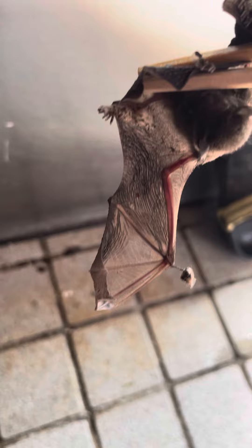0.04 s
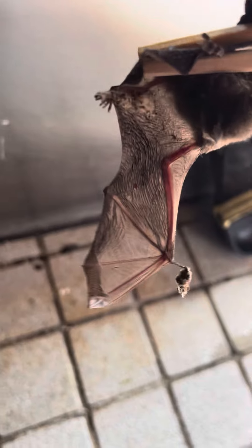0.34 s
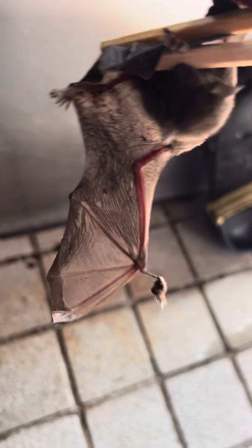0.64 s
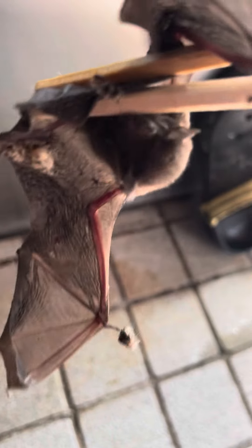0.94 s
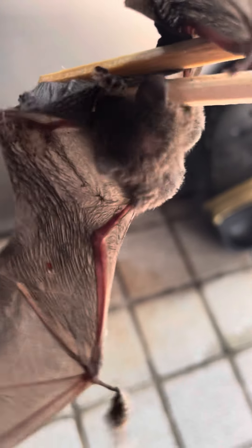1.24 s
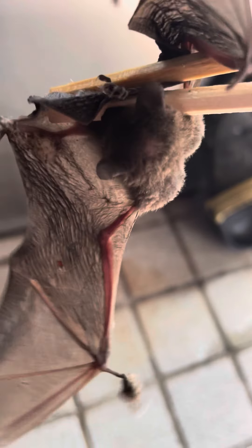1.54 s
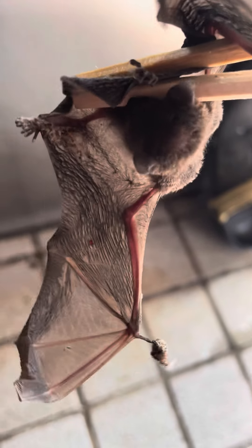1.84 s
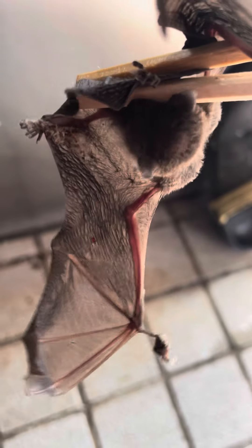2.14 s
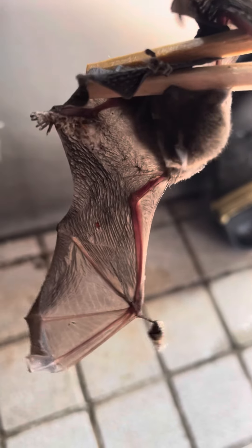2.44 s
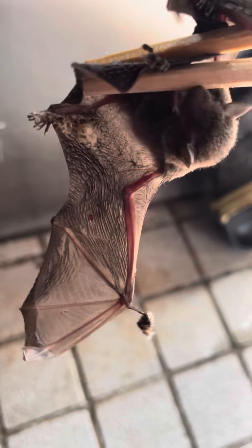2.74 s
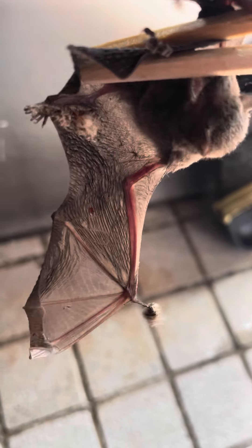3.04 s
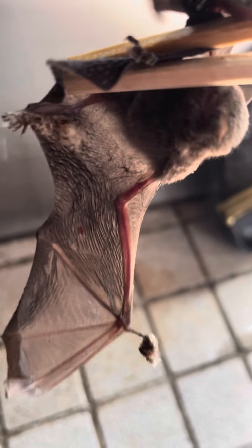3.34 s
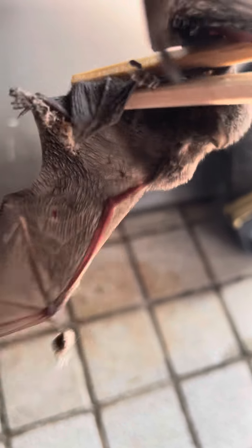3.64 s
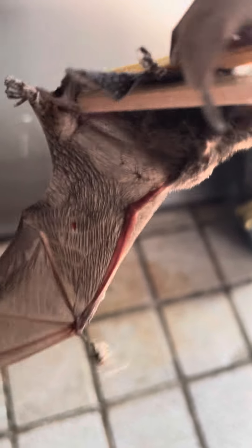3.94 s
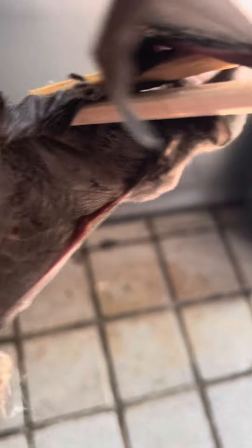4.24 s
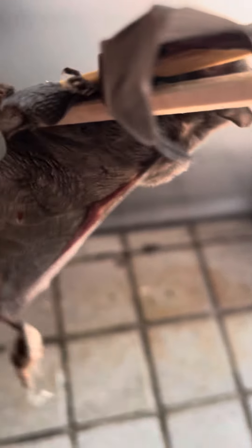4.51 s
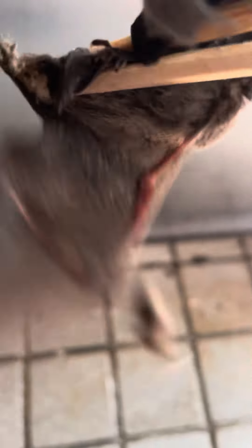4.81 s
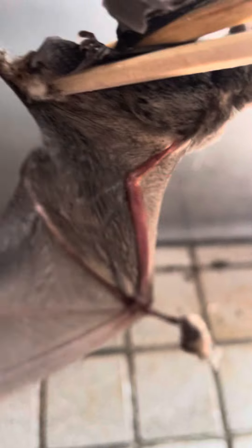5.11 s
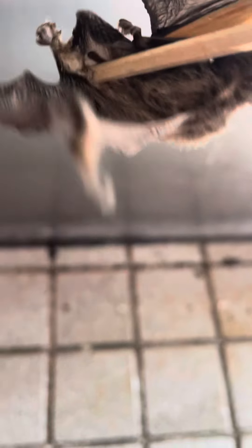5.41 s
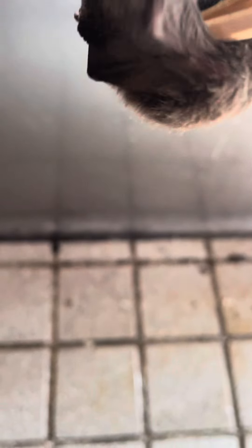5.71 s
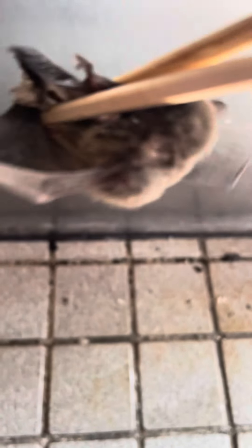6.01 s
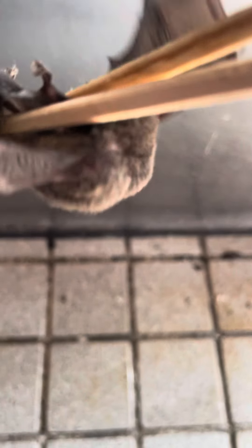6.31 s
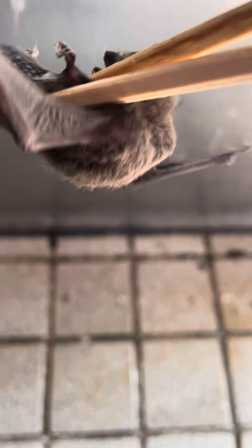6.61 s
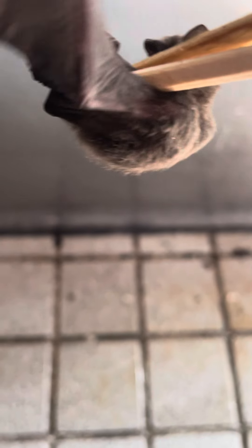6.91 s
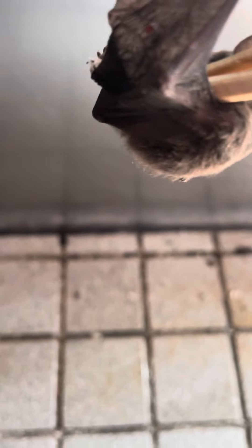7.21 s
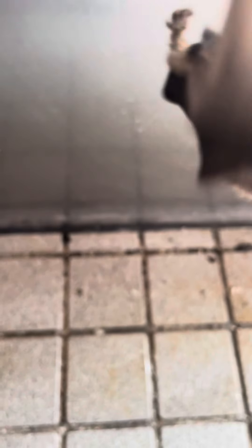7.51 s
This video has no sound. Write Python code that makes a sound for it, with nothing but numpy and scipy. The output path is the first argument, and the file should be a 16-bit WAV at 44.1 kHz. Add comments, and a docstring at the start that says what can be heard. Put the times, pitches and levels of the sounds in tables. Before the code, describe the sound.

A bat held in wooden tongs makes tiny, very high squeaks, whistles and sharp clicks close to the microphone. The calls are scattered at first, with soft scuffs of wing on wood. Past the middle they grow louder, denser and raspier, and the wing crackles briefly; then they thin out again. A small tiled room adds a short echo, and appliance motors hum steadily behind.

```python
"""A bat held in wooden tongs protests close to a phone, in a small tiled room.
Vibrating membranes in its throat make thin calls that jump between whistles, squeaks and a harsh rasp,
among sharp clicks. A wing rubs on the wood and crackles as it is shaken; the tiles add a short echo.
Behind it, two appliance motors hum steadily over a low rumble and a faint hiss."""
import sys
import numpy as np
from scipy import signal
from scipy.fft import rfft, irfft, next_fast_len
from scipy.io import wavfile
from scipy.ndimage import map_coordinates

SR = 44100
rng = np.random.default_rng(int(sys.argv[2]) if len(sys.argv) > 2 else 0)


def master_out(mix):
    """Clip the mix to full scale and print it as 16-bit PCM to the path in sys.argv[1]."""
    frames = np.transpose(np.atleast_2d(mix))
    ceiling = np.clip(frames, -1, 1)
    pcm = np.round(ceiling * 32767).astype(np.int16)
    wavfile.write(sys.argv[1], SR, pcm)


N = 342216


def amp(db):
    """Turn decibels into a number to multiply a sound by."""
    return 10 ** (np.asarray(db) / 20)


def unit(x):
    """Scale a sound to an average strength (rms) of 1."""
    return x / np.sqrt(np.mean(x ** 2) + 1e-20)


def along(points, hz):
    """Read a table of (pitch_hz, value) rows at any pitch, sliding between the rows."""
    pitches, values = np.transpose(points)
    return np.interp(np.log(hz + 1), np.log(pitches + 1), values)


def wobble(rate, size=N):
    """A smooth curve through `rate` random values a second."""
    values = rng.standard_normal(int(size * rate / SR) + 4)
    return map_coordinates(values, [np.arange(size) * rate / SR])


def filtered(x, response):
    """Scale and delay each pitch in a sound as response(hz) says."""
    size = next_fast_len(N + SR // 2)
    return irfft(rfft(x, size) * response(np.fft.rfftfreq(size, 1 / SR)), size)[..., :N]


def coloured(x, colour):
    """Give a sound a colour (its balance of low and high pitches), at strength 1."""
    return unit(filtered(x, lambda hz: amp(along(colour, hz))))


def add(track, start_s, sound):
    """Mix a sound into the track."""
    part = track[max(round(start_s * SR), 0):][:len(sound)]
    part += sound[:len(part)]


def swell(length_s):
    """Progress from 0 to 1 through a note, and a loudness that rises and falls."""
    progress = np.linspace(0, 1, int(length_s * SR))
    return progress, np.sin(np.pi * progress)


def bursts(rows, attack_s, release_s, sag_db):
    """Loudness over time for (start_s, length_s, level_db) rows: each rises, sags, then dies away."""
    loudness = np.zeros(N)
    for start_s, length_s, level_db in rows:
        t = np.arange(-3 * attack_s, length_s + 10 * release_s, 1 / SR)
        rise = .5 * (1 + np.tanh(t / attack_s))
        fall = np.exp(-np.maximum(t - length_s, 0) / release_s)
        level = amp(level_db - sag_db * np.clip(t / length_s, 0, 1))
        add(loudness, start_s + t[0], rise * fall * level)
    return loudness


def crackle(rate, scatter, noise_share):
    """About `rate` ticks a second, uneven in timing and size, mixed with hiss."""
    gaps, sizes = rng.standard_normal((int(2 * rate * N / SR), 2)).T
    positions = np.cumsum(np.exp(scatter * gaps) * SR / rate).astype(int)
    ticks = np.bincount(positions, np.exp(.6 * np.minimum(sizes, 2)), N)[:N]
    hiss = rng.standard_normal(N)
    return np.sqrt(1 - noise_share) * unit(ticks - ticks.mean()) + np.sqrt(noise_share) * hiss


# How alike the left and right channels of the background and echo sound:
# pitch_hz, likeness (1 same, -1 opposite)
CHANNEL_LIKENESS = [(60, 1), (130, .999), (290, .96), (640, .75), (1300, .78), (3000, .1), (5000, .3),
                    (7500, -.3), (8700, -1), (13000, -1), (15500, -.93)]

def channel_angle(hz):
    """Likeness as an angle: 0 when left and right agree, pi when they are opposite."""
    return np.arccos(np.clip(along(CHANNEL_LIKENESS, hz), -1, 1))


def spread(pair, colour):
    """Blend two unrelated signals into left and right channels with that likeness and a colour."""
    def response(hz):
        turn = channel_angle(hz) / 2
        return amp(along(colour, hz)) * [np.cos(turn), np.sin(turn)]
    shared, opposed = filtered(pair, response)
    return np.array([shared + opposed, shared - opposed])


# The compressor's tones, heard from two places: speed_multiple, first_place_db, second_place_db
COMPRESSOR_TONES = [(1, -54, -52.5), (3, -58, -57), (7, -68, -72), (9, -66.5, -69), (14, -69.5, -75),
                    (17, -69, -74.5), (20, -64.5, -66), (22, -79.5, -71.5), (23, -64, -73),
                    (25, -73.5, -73), (40, -72, -80), (43, -75, -77), (66, -82, -90)]
# The second motor, its fan and a faint whine: pitch_hz, first_place_db, second_place_db
FAN_TONES = [(67.2, -58.5, -58.5), (78.7, -59.5, -54), (116.24, -56, -54), (121.1, -52, -51.5),
             (157.9, -60.5, -56), (204.6, -65.5, -69), (249, -67.5, -71.5), (351.5, -64, -67.5),
             (4010, -96, -79.5)]
COMPRESSOR_HZ = 46.07

def motor_hum():
    """Two motors hum; each tone changes level as the phone moves through its loud and quiet spots."""
    t = np.arange(N) / SR
    motor_time = t + .00016 * wobble(1.492)  # the speed drifts a little
    moved = np.interp(t, [4.3, 5.1], [.083, 1])  # 0 is the first place, 1 the second
    tones = [(multiple * COMPRESSOR_HZ, *levels) for multiple, *levels in COMPRESSOR_TONES]
    out = np.zeros((2, N))
    for hz, first_db, second_db in tones + FAN_TONES:
        level_db = first_db + moved * (second_db - first_db)
        phase = 2 * np.pi * (hz * motor_time + rng.random())
        channel_shift = channel_angle(hz) * np.array([[.3], [-.3]])
        out += np.sqrt(2) * amp(level_db) * np.sin(phase + channel_shift)
    return out


# Colours of the room's rumble and hiss: pitch_hz, relative_db
RUMBLE_COLOUR = [(25, -38), (33, -16), (45, 4), (80, -0.5), (130, -2), (220, -7.5), (400, -14.5),
                 (2200, -33.5)]
HISS_COLOUR = [(1500, -18.5), (2200, -9), (2700, -0.5), (3200, -1.5), (4250, -9.5), (4800, -3.5),
               (5700, -8), (7800, -15), (12500, -17), (16000, -24)]
RUMBLE_DB, HISS_DB = -47, -65.5

def room_noise():
    """A low rumble, nearly the same left and right, lies under a faint hiss."""
    treble_cut = [(5000, -120)]
    rumble = unit(spread(rng.standard_normal((2, N)), RUMBLE_COLOUR + treble_cut))
    hiss = unit(spread(rng.standard_normal((2, N)), HISS_COLOUR))
    return amp(RUMBLE_DB) * rumble + amp(HISS_DB) * hiss


# The voice holding one tone: start_s, length_s, start_hz, end_hz, level_db
WHISTLE_NOTES = [(0.293, 0.022, 9600, 9500, -49), (0.837, 0.043, 10400, 10300, -50),
                 (1.479, 0.013, 7700, 9000, -57), (1.486, 0.044, 9160, 9200, -46),
                 (2.015, 0.05, 9620, 9400, -43.5), (4.111, 0.047, 9850, 9650, -43.5),
                 (4.323, 0.01, 12400, 12100, -34), (4.333, 0.013, 8300, 7900, -48),
                 (4.345, 0.012, 9950, 10130, -40), (4.489, 0.014, 10900, 10500, -33),
                 (4.503, 0.012, 15100, 15700, -28), (4.547, 0.0083, 15430, 15400, -22),
                 (4.55, 0.0107, 14500, 14950, -23.5), (4.556, 0.0078, 15400, 15460, -20),
                 (4.744, 0.015, 8750, 8520, -38.5), (4.767, 0.015, 14800, 15400, -30),
                 (5.608, 0.008, 15650, 15550, -22), (5.613, 0.042, 4230, 4040, -58),
                 (5.79, 0.034, 10030, 9830, -43), (5.816, 0.0061, 4330, 4070, -47.5),
                 (5.822, 0.014, 15330, 15750, -36), (6.947, 0.01, 15700, 15700, -36)]
ROUGH_HZ = 9000  # whistles are fully rough below this pitch and ever cleaner above it
JITTER, GRIT = .012, .35  # shares by which a rough tone's pitch and strength tremble
ARCH, FLUTTER_DB = .04, 3  # share by which a rough tone's pitch droops at its ends; fast level flutter

def whistles():
    """The vocal membranes settle on one gliding, fluttering tone; lower ones arch and rasp more."""
    out = np.zeros(N)
    for start_s, length_s, start_hz, end_hz, level_db in WHISTLE_NOTES:
        progress, shape = swell(length_s)
        roughness = min((ROUGH_HZ / start_hz) ** 2, 1)
        arch = 1 - roughness * ARCH * (2 * progress - 1) ** 2
        pitch_hz = (start_hz + (end_hz - start_hz) * progress) * arch
        tone = np.sin(glide(pitch_hz, jitter=roughness * JITTER))
        grit = 1 + roughness ** 2 * GRIT * wobble(4500, len(shape))
        level = amp(level_db + FLUTTER_DB * wobble(600, len(shape)))
        add(out, start_s, np.sqrt(2) * level * shape * grit * tone)
    return out


def glide(pitch_hz, jitter):
    """The phase (running angle) of a tone that trembles as it follows a changing pitch."""
    trembling_hz = pitch_hz * (1 + jitter * wobble(1500, len(pitch_hz)))
    return 2 * np.pi * np.cumsum(trembling_hz) / SR


# Sharp, dry clicks, before the two gains below: start_s, body_db, treble_db
DRY_CLICKS = [(0.2967, -45, -43), (0.5572, -51, -51.5), (0.5887, -38, -46), (1.067, -50, -48),
              (2.074, -51, -47), (2.483, -40.5, -44), (2.7152, -41, -39), (2.7205, -51, -46),
              (4.098, -49, -50), (4.4875, -36.5, -57), (4.9206, -37.5, -47.5), (5.1065, -45, -37),
              (5.2569, -38, -45.5), (5.5617, -40, -46), (6.8718, -50, -54), (6.8948, -42, -52)]
# Colours of a click's body and treble: pitch_hz, relative_db
CLICK_BODY_COLOUR = [(400, -40), (2400, -8), (4000, -1), (5300, 0), (7000, -3), (12000, -22)]
CLICK_TREBLE_COLOUR = [(4000, -35), (8500, -2), (12000, -2), (15500, 0), (16800, -25)]
CLICK_BODY_GAIN_DB, CLICK_TREBLE_GAIN_DB = -2, 3
CLICK_FADE_S = .005  # time to fade by 60 dB

def clicks():
    """Each click is a dry, broad snap of about a millisecond."""
    t = np.arange(SR // 40) / SR
    fade = amp(-60 * t / CLICK_FADE_S)
    body, treble = np.zeros((2, N))
    for start_s, body_db, treble_db in DRY_CLICKS:
        add(body, start_s, amp(body_db + CLICK_BODY_GAIN_DB) * fade)
        add(treble, start_s, amp(treble_db + CLICK_TREBLE_GAIN_DB) * fade)
    body *= coloured(rng.standard_normal(N), CLICK_BODY_COLOUR)
    treble *= coloured(rng.standard_normal(N), CLICK_TREBLE_COLOUR)
    return body + treble


# Short harsh rasps and scrapes: start_s, length_s, top_db, middle_db, low_db
RASPS_AND_SCRAPES = [(0.315, 0.0098, -40, -54, -48.5), (0.831, 0.058, -50, -49, -54),
                     (1.074, 0.009, -41, -60, -44.5), (3.26, 0.025, -65, -57, -48.5),
                     (3.816, 0.011, -34.5, -41, -44), (4.106, .011, -41, -45, -50),
                     (4.126, 0.015, -45, -50, -55), (4.323, 0.021, -44, -48, -50),
                     (4.498, 0.0065, -42.5, -29, -46), (4.513, 0.03, -41, -42, -59),
                     (4.54, 0.032, -31, -40, -64), (4.74, 0.012, -43, -39, -52),
                     (4.759, .011, -42, -32, -50), (4.928, .006, -47.5, -33.5, -44),
                     (4.951, 0.0078, -42, -43, -51), (5.259, .017, -50, -46.5, -48.5),
                     (5.377, 0.064, -57, -71, -56), (5.574, 0.052, -36, -53, -49),
                     (5.628, 0.029, -30.5, -51, -54), (5.816, 0.018, -35, -50, -54),
                     (6.161, 0.04, -55, -60, -52), (6.372, 0.079, -54.5, -74, -63),
                     (6.876, 0.0046, -39, -57, -47), (6.9, 0.033, -42.5, -70, -67),
                     (7.157, 0.039, -58, -87, -51.5), (7.531, 0.014, -53, -43.5, -54)]
# Colours of their three ringing ranges: pitch_hz, relative_db
RASP_LOW_COLOUR = [(800, -25), (2500, -9), (3500, -6.5), (5100, 3), (6300, -5.5), (7500, -4),
                   (10000, -39.5), (16000, -51)]
RASP_MIDDLE_COLOUR = [(2500, -55), (6500, -18), (8000, -5), (10500, 0), (13500, 0), (15300, -9),
                      (16300, -45)]
RASP_TOP_COLOUR = [(5000, -70), (12500, -26), (14000, -14), (15100, -5), (15550, 1), (15750, 0),
                   (16000, -28), (17000, -50)]
TOP_WANDER_HZ = 130

def rasps():
    """Uneven pulses ring in three pitch ranges; the top one wanders and grows as the lower two fade."""
    pulses = crackle(rate=1500, scatter=.31, noise_share=.35) * amp(2.4 * wobble(290))
    start_s, length_s, top_db, middle_db, low_db = np.transpose(RASPS_AND_SCRAPES)
    harsh = np.zeros(N)
    for colour, level_db in [(RASP_LOW_COLOUR, low_db), (RASP_MIDDLE_COLOUR, middle_db)]:
        loudness = bursts(zip(start_s, length_s, level_db), attack_s=.002, release_s=.003, sag_db=11.5)
        harsh += loudness * coloured(pulses, colour)
    shift_hz = TOP_WANDER_HZ * np.minimum(wobble(120), .5)
    shifter = np.exp(2j * np.pi * np.cumsum(shift_hz) / SR)  # slides the whole top range up and down
    top = np.real(signal.hilbert(coloured(pulses, RASP_TOP_COLOUR)) * shifter)
    top *= bursts(zip(start_s, length_s, top_db), attack_s=.0033, release_s=.003, sag_db=-4.5)
    return harsh + top


# The bat's lower voice: start_s, length_s, pitch_hz, level_db, third_harmonic_boost_db
SQUEAK_NOTES = [(0.325, 0.023, 5230, -50.5, 13.5), (0.871, 0.016, 5220, -54.5, 7),
                (2.725, 0.033, 5020, -53, 4.5), (6.146, .012, 4450, -54, 1)]
SQUEAK_FALL, SQUEAK_DROP = .01, .14  # shares of the pitch lost steadily, and as the squeak gives out
SQUEAK_BREAK = .68  # share of its length after which a squeak gives out

def squeaks():
    """An octave lower, the throat's top range rings at three times the pitch until the voice breaks."""
    out = np.zeros(N)
    for start_s, length_s, pitch_hz, level_db, third_db in SQUEAK_NOTES:
        progress, shape = swell(length_s)
        giving_out = np.clip((progress - SQUEAK_BREAK) / (1 - SQUEAK_BREAK), 0, 1)
        phase = glide(pitch_hz * (1 - SQUEAK_FALL * progress - SQUEAK_DROP * giving_out), jitter=.008)
        grit = 1 + GRIT * (1 + giving_out) * wobble(1400, len(shape))
        second = amp(-10.5) * np.sin(2 * phase)
        third = amp(third_db) * np.exp(-10 * giving_out) * np.sin(3 * phase)
        level = amp(level_db + FLUTTER_DB * wobble(600, len(shape)))
        add(out, start_s, np.sqrt(2) * level * shape * (grit * np.sin(phase) + second + third))
    return out


# Wing and claws catching on the tongs: start_s, length_s, body_db, treble_db
WOOD_SCUFFS = [(1.22, 0.003, -54, -61), (1.47, 0.0013, -48, -61), (1.528, 0.0018, -48.5, -49),
               (1.662, 0.00089, -45.5, -40.5), (1.6995, 0.0024, -36.5, -52), (1.7053, .0035, -38, -50),
               (1.731, 0.047, -54, -76), (1.781, 0.062, -51.5, -57.5), (2.056, 0.021, -61, -54.5),
               (2.238, 0.0069, -61, -48), (6.036, 0.016, -48.5, -50), (6.356, 0.011, -47, -47),
               (7.526, 0.0062, -43, -49)]
# Colours of a scuff's body and treble: pitch_hz, relative_db
SCUFF_BODY_COLOUR = [(600, -16), (3200, -16.5), (4100, -2.5), (5400, 4), (7200, -14), (11000, -42)]
SCUFF_TREBLE_COLOUR = [(5000, -13.5), (9000, -1.5), (12800, -16), (15400, 0), (16400, -36)]

def scuffs():
    """Skin and claws catch on the wood in tiny slips; a short scuff starts hard, a long one eases in."""
    slips = crackle(rate=1000, scatter=.56, noise_share=.42) * amp(1.9 * wobble(200))
    body, treble = np.zeros((2, N))
    for start_s, length_s, body_db, treble_db in WOOD_SCUFFS:
        stroke = dict(attack_s=.13 * length_s, release_s=.0012, sag_db=3)
        body += bursts([(start_s, length_s, body_db)], **stroke)
        treble += bursts([(start_s, length_s, treble_db)], **stroke)
    return body * coloured(slips, SCUFF_BODY_COLOUR) + treble * coloured(slips, SCUFF_TREBLE_COLOUR)


# Skin sliding on wood: start_s, length_s, level_db
SKIN_SLIDES = [(1.62, 0.57, -60.5), (4.66, 0.49, -60), (7.62, 0.14, -64.5)]
# Colour of that rustle: pitch_hz, relative_db
RUSTLE_COLOUR = [(900, -25), (1600, 7), (2400, 9), (3300, 3), (5000, 1), (14000, -46.5)]

def skin_rustle():
    """Skin slides on the wood with a soft rustle whenever the grip shifts."""
    loudness = bursts(SKIN_SLIDES, attack_s=.04, release_s=.04, sag_db=3) * amp(1.8 * wobble(40))
    return loudness * coloured(rng.standard_normal((2, N)), RUSTLE_COLOUR)


# Bursts and single cracks of the shaken wing: start_s, length_s, skin_db, body_db
WING_SHAKES = [(4.9667, .0012, -28, -50), (4.9818, 0.022, -25.5, -48), (5.03, 0.007, -26, -61),
               (5.0442, 0.014, -28.5, -55), (5.068, 0.001, -25.5, -53), (5.0738, 0.006, -26.5, -69),
               (5.08, 0.0016, -23, -62), (5.085, 0.0069, -29, -67)]
# Colours of the tight skin and of the whole wing: pitch_hz, relative_db
WING_SKIN_COLOUR = [(500, -40), (2600, -17), (4200, -11), (6100, -19), (8000, -.5), (10000, -3),
                    (12000, 1.5), (14000, 0), (15500, 3), (16300, -12), (16900, -40)]
WING_BODY_COLOUR = [(600, -35), (1700, -7), (2600, 0), (3800, 0), (5200, -4), (6200, -18), (9000, -30)]

def wing_crackle():
    """The tight skin crackles in quick bursts when shaken; the whole wing sounds faintly below it."""
    start_s, length_s, skin_db, body_db = np.transpose(WING_SHAKES)
    snaps = crackle(rate=1700, scatter=.6, noise_share=.6)
    out = np.zeros(N)
    for colour, level_db in [(WING_SKIN_COLOUR, skin_db), (WING_BODY_COLOUR, body_db)]:
        loudness = bursts(zip(start_s, length_s, level_db), attack_s=.0003, release_s=.0006, sag_db=4)
        out += loudness * coloured(snaps, colour)
    return out


# How long the echo takes to fade by 60 dB: pitch_hz, fade_s
ECHO_FADES = [(4000, 0.28), (10000, 0.34), (15000, 0.27)]
# The echo's strength next to the direct sound: pitch_hz, relative_db
ECHO_COLOUR = [(4000, -12), (10000, -21), (14400, -19.5), (15500, -12.5)]

def tile_echo(sound):
    """Sound bounces between the tiles and comes back as a short, blurred tail."""
    hz, t, noise = signal.stft(rng.standard_normal((2, SR // 2)), SR, nperseg=256)
    fade = amp(-60 * t / along(ECHO_FADES, hz)[:, None])
    _, tail = signal.istft(noise * fade, SR, nperseg=256)
    tail /= np.linalg.norm(tail[0])
    echo = signal.fftconvolve(sound[None], tail, axes=1)[:, :N]
    return spread(echo, ECHO_COLOUR)


# Moments when the background gets quieter: start_s, length_s
BACKGROUND_DIPS = [(0.319, .15), (0.595, 0.17), (5.101, 0.094), (5.681, 0.094)]
DIP_DB, DIP_EDGE_S = -4.5, .02

def background_level():
    """The level of the hum and room noise dips briefly, with soft edges."""
    level_db = np.zeros(N)
    for start_s, length_s in BACKGROUND_DIPS:
        t = np.arange(-DIP_EDGE_S, length_s + DIP_EDGE_S, 1 / SR)
        depth = np.clip((np.minimum(t, length_s - t) + DIP_EDGE_S) / (2 * DIP_EDGE_S), 0, 1)
        add(level_db, start_s - DIP_EDGE_S, DIP_DB * np.sin(depth * np.pi / 2) ** 2)
    return amp(level_db)


# How far the bat's sound in the left channel runs ahead of the right: pitch_hz, lead_radians
LEFT_LEAD = [(1500, 0), (5000, .15), (7000, 2), (10000, 2.85), (13000, 3.3), (15300, 4.25)]

def scene():
    """The bat's sound reaches left and right out of step, more so at higher pitches; the room lies behind it."""
    bat = rasps() + whistles() + squeaks() + clicks() + wing_crackle() + scuffs()
    direct = filtered(bat, lambda hz: np.exp(1j * along(LEFT_LEAD, hz) * np.array([[.5], [-.5]])))
    return direct + tile_echo(bat) + skin_rustle() + background_level() * (motor_hum() + room_noise())


PHONE_LIMIT_HZ = 17100

def record(dry):
    """The phone keeps nothing above its pitch limit."""
    return filtered(dry, lambda hz: hz < PHONE_LIMIT_HZ)


dry = scene()
out = record(dry)
master_out(out)
```